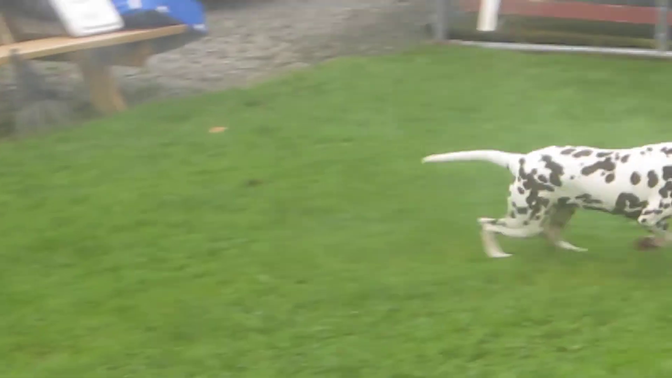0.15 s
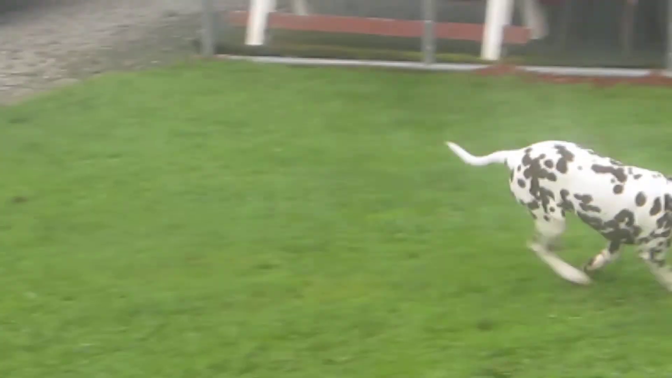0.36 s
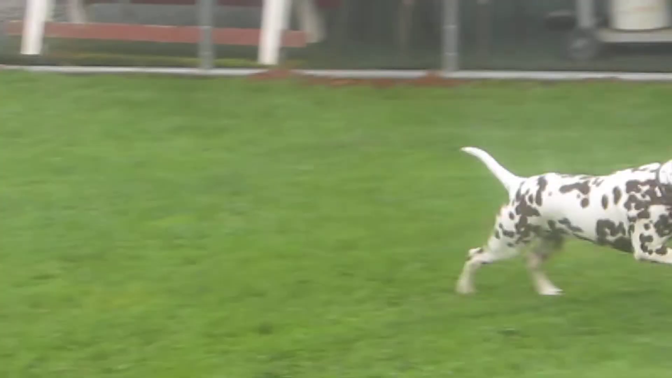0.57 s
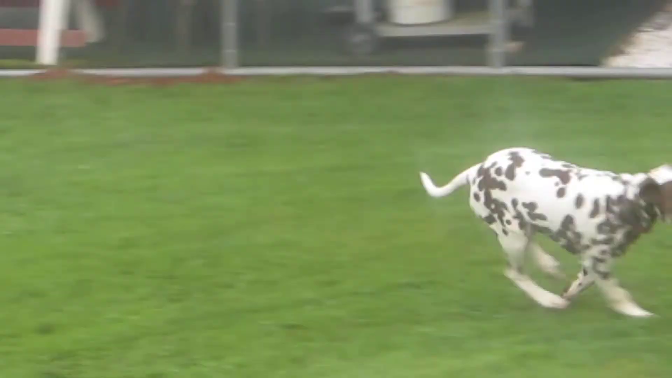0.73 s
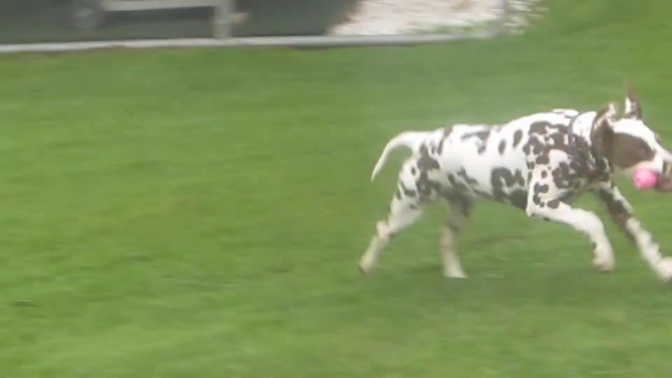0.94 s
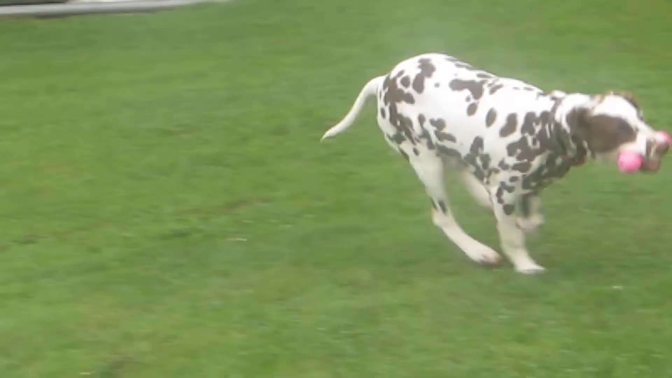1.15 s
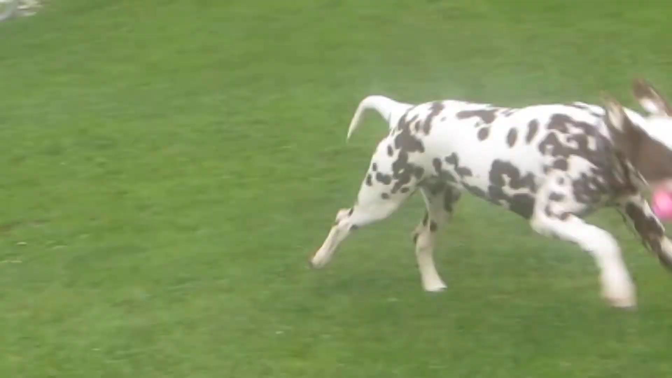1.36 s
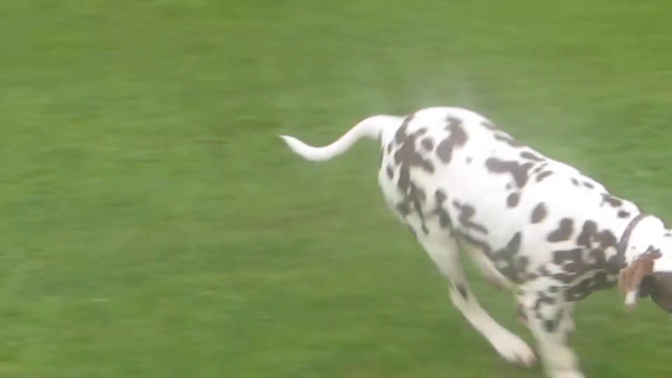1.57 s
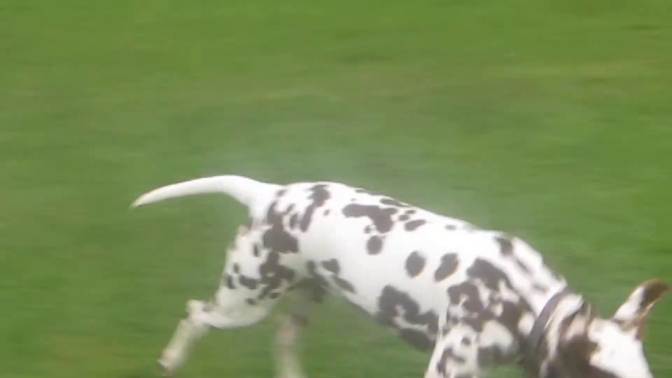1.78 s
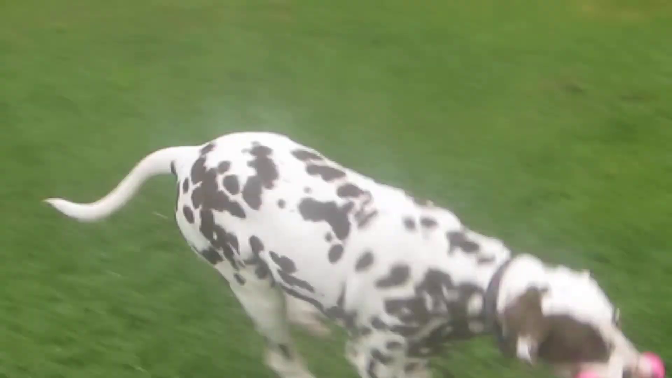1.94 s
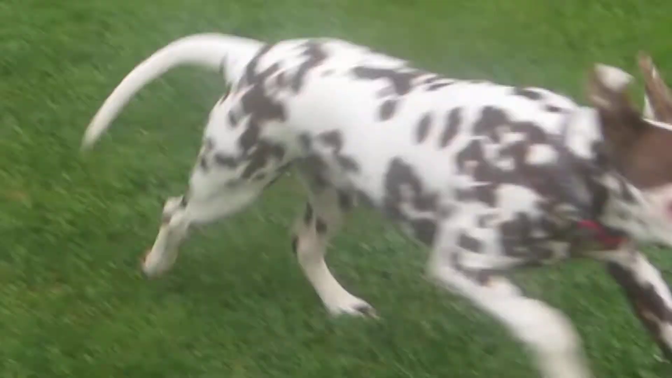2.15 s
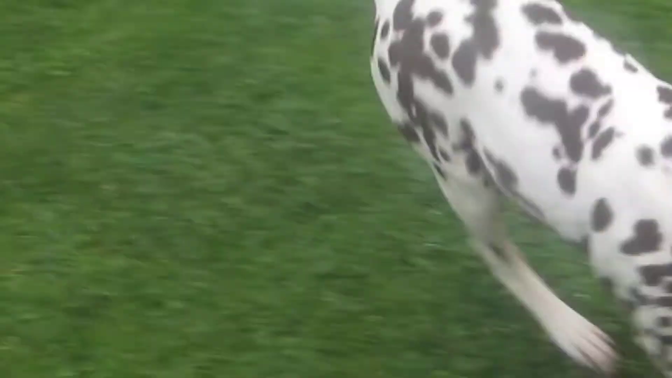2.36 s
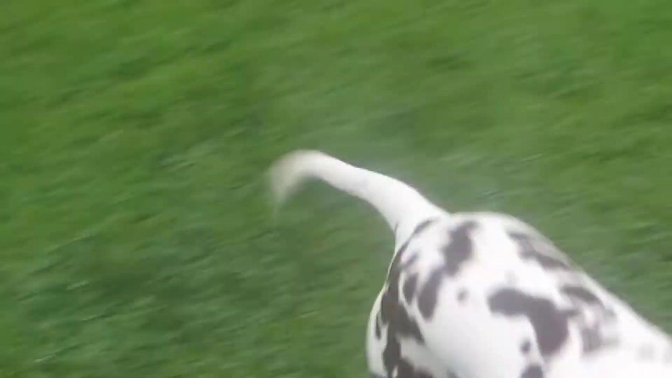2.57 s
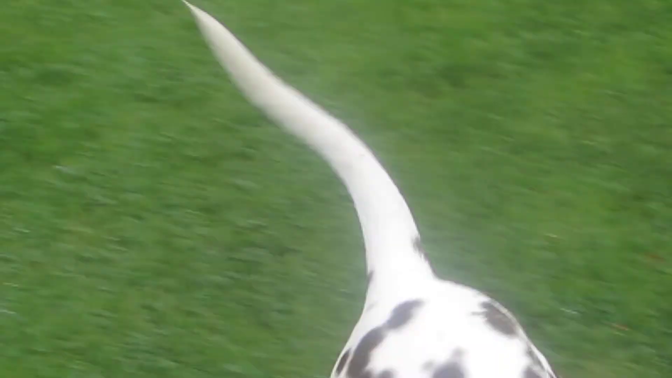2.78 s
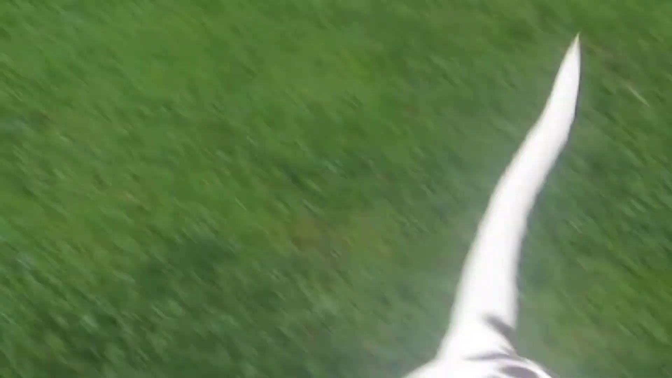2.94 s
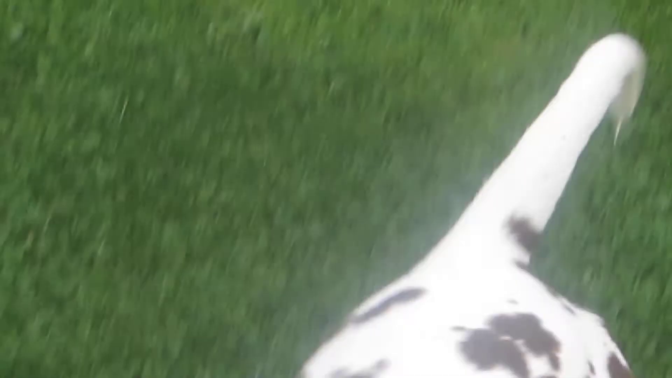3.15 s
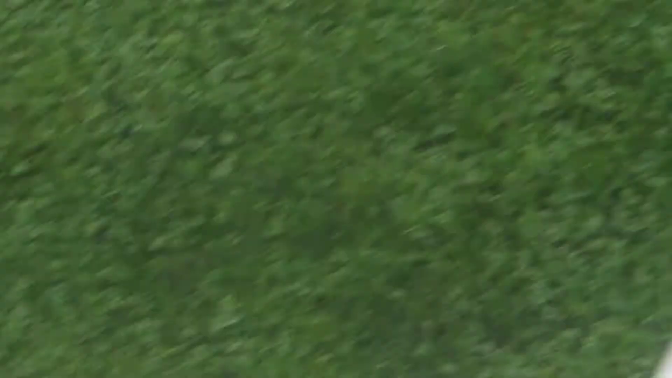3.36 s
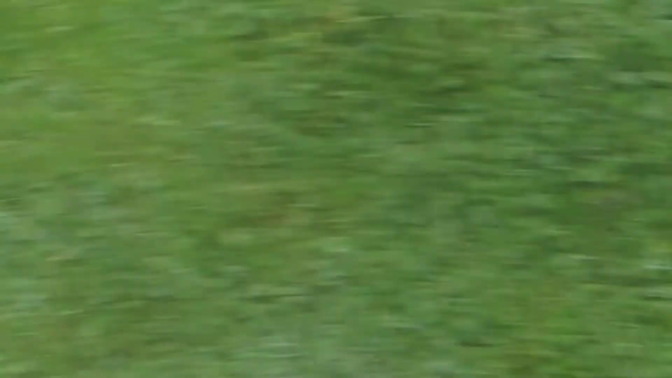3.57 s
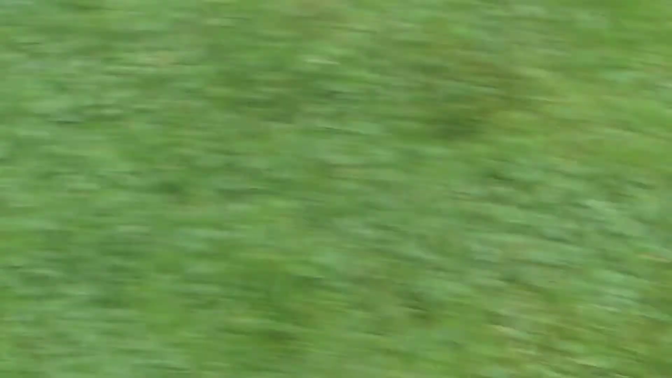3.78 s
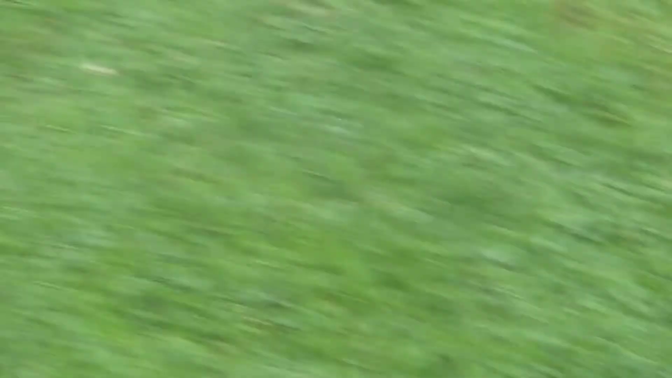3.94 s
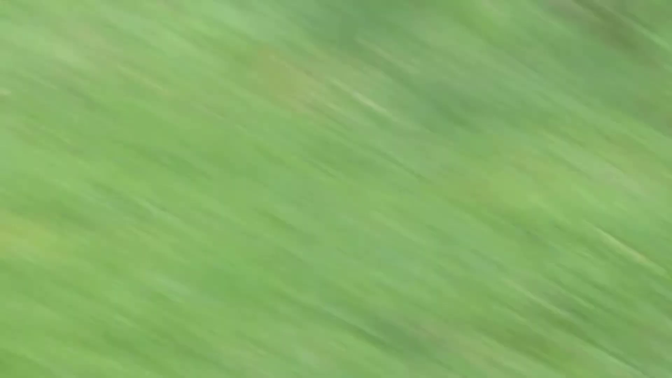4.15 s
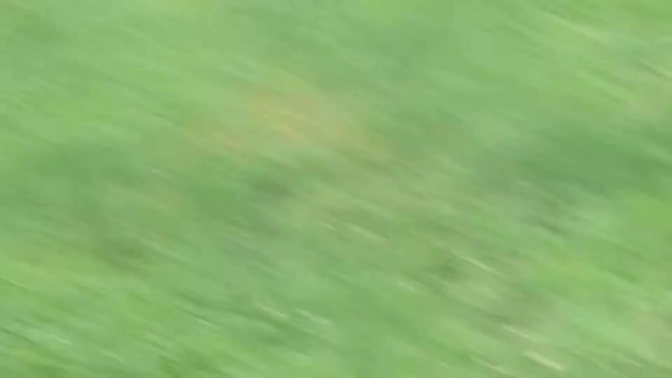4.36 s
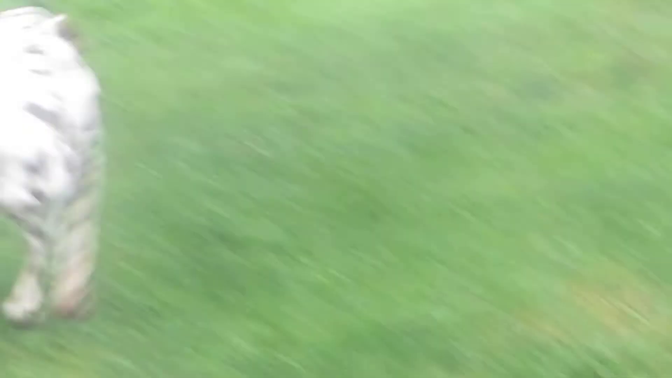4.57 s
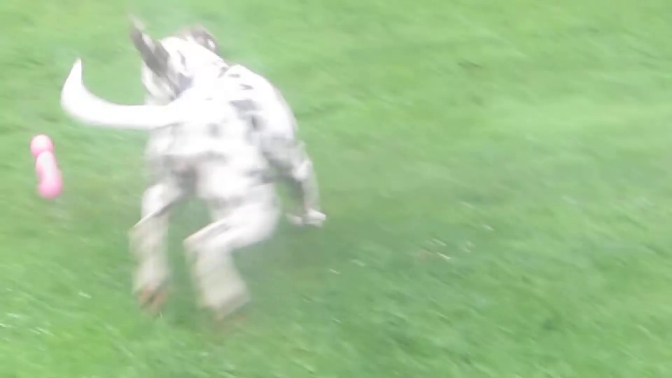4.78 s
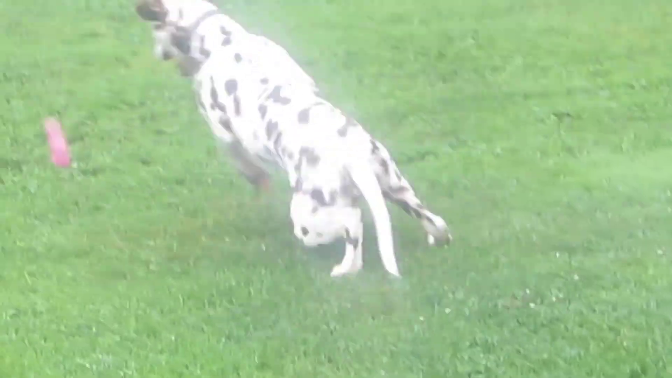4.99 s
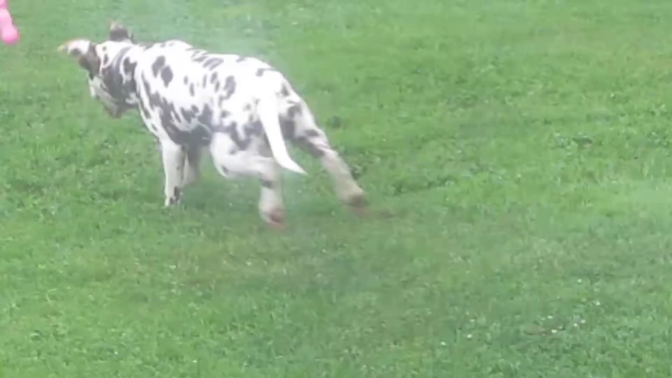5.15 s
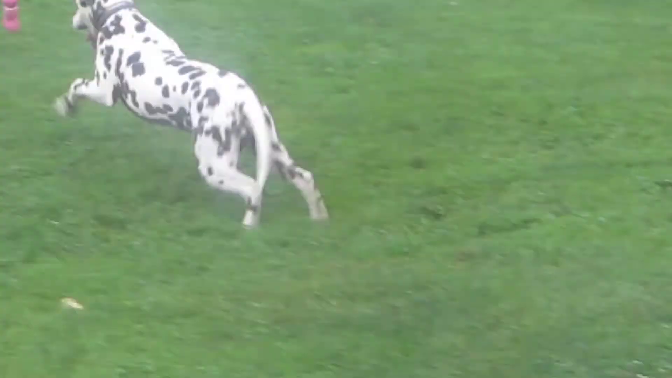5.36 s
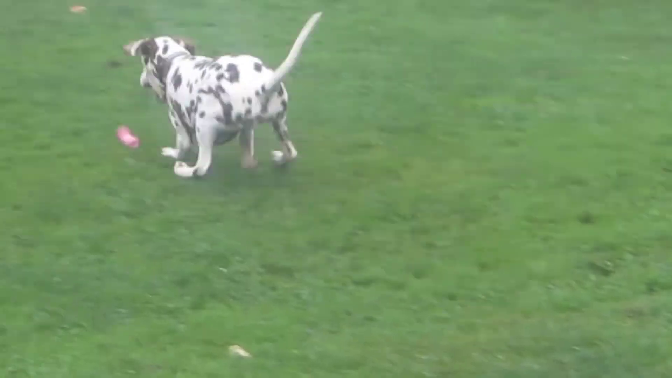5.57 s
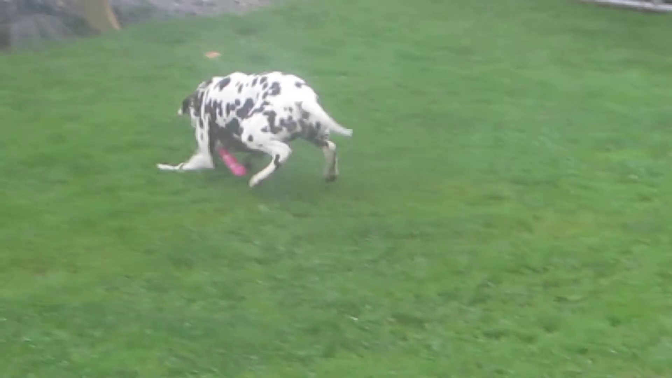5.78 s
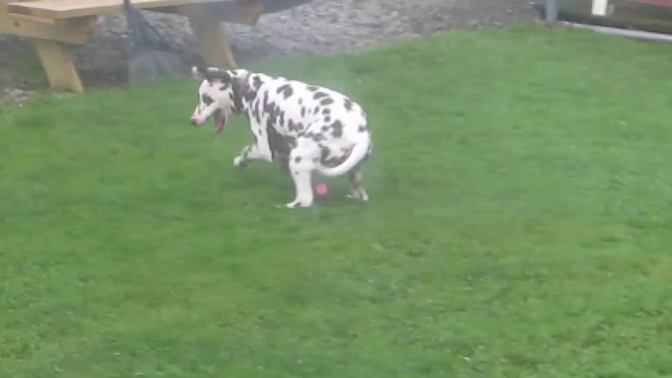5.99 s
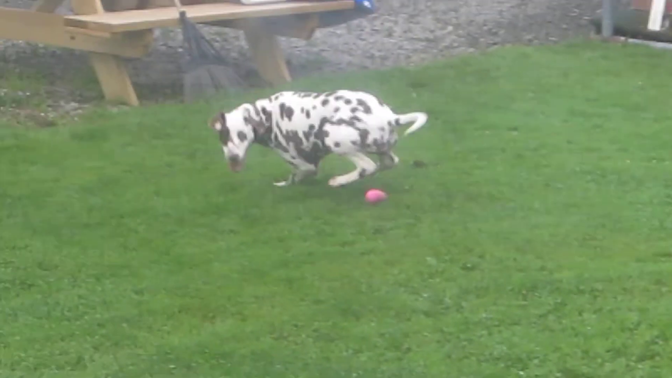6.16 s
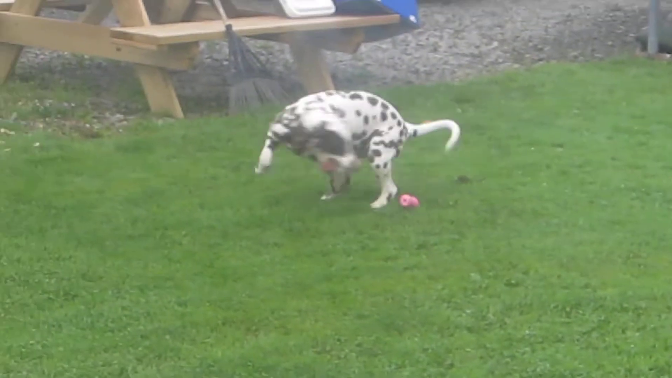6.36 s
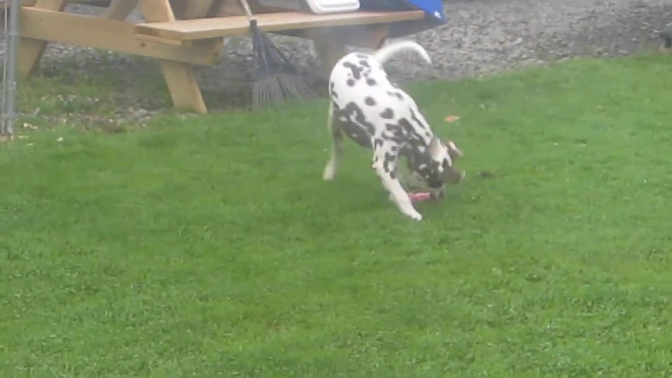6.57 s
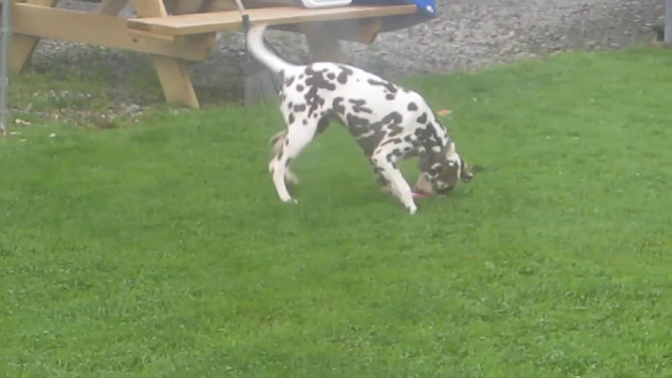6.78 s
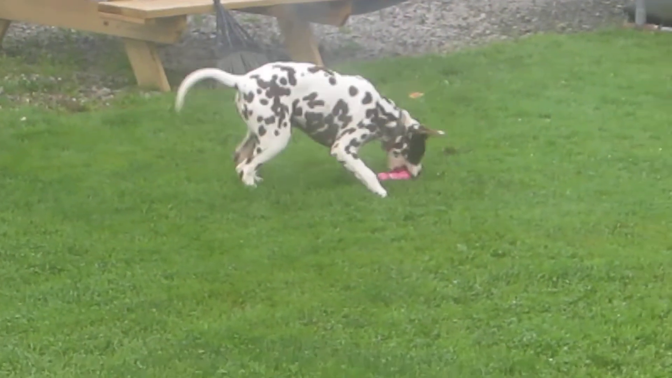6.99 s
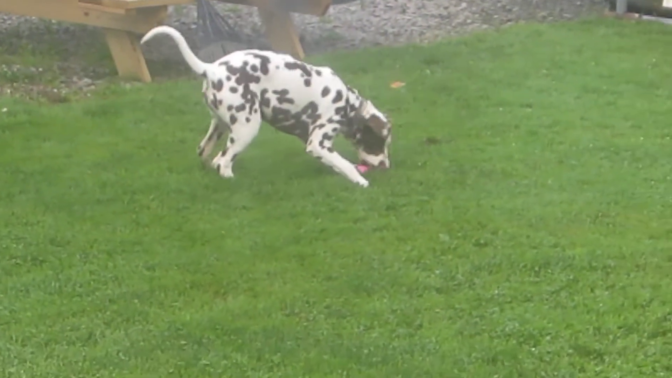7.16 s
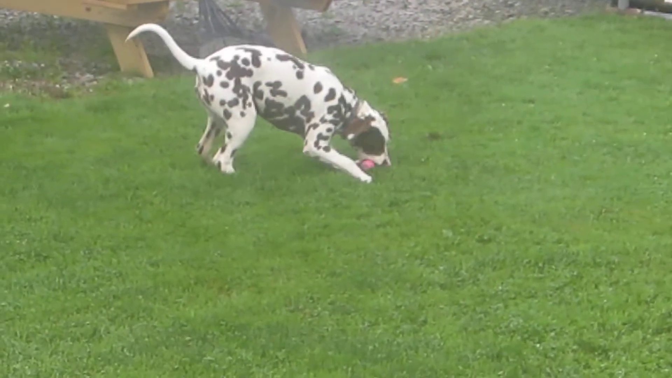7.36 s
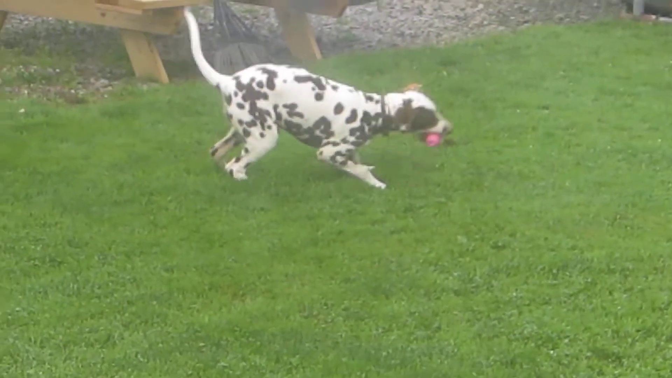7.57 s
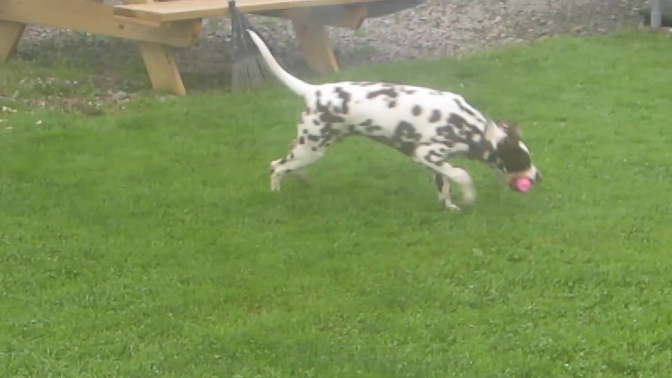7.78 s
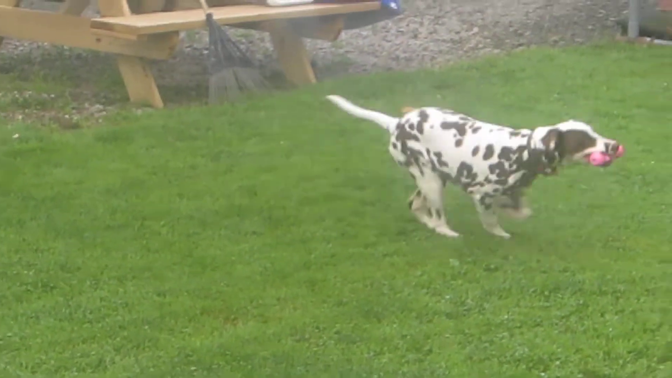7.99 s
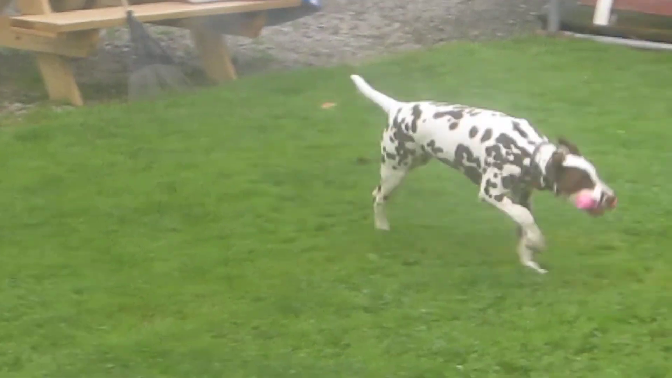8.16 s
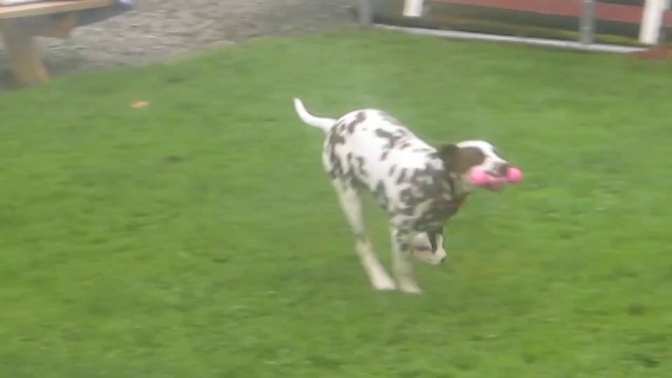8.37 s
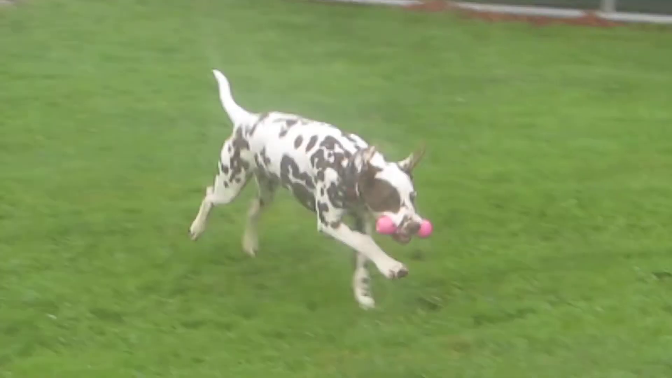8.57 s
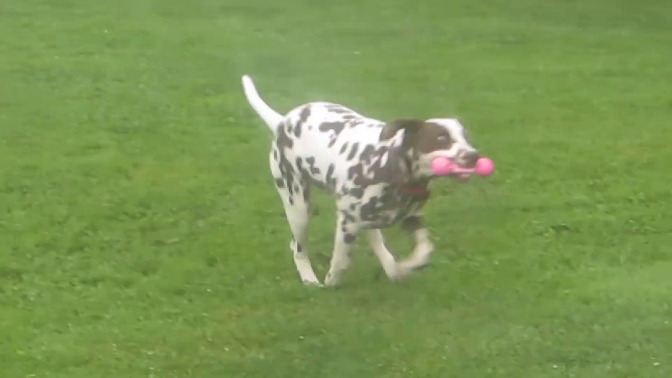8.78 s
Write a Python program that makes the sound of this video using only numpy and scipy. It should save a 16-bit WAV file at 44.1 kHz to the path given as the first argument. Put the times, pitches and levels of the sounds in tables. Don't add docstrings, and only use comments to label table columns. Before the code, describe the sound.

In a backyard with low town rumble and soft hiss, a dog works a squeaky rubber toy. A short nip at 0.1 s leads to a hard bite at 0.3-0.45 s, its reedy pitch leaping up, then wheezy, falling refills. Irregular squeaks and chirps continue through 2 s, with paws swishing grass. Two close, piercing bites at about 2.2 and 2.9 s shoot to the top and pop off; the background briefly dips. From 3.4 to 4.3 s squeaks become weak and muffled. At 4.65 s the toy drops: sharp crack, thud and chirp, with smaller bounces at 5.0 and 5.2 s. Grass rustles, scuffs, faint collar ticks and distant bird whistles fill 4.7-6.9 s, then near quiet. After pickup, bright rising squeaks burst at 7.4, 7.9, 8.4 and 8.75 s, separated by gasping refills, echoing lightly off sheds and fences, the last rising to the end.

```python
import sys
import numpy as np
from scipy import signal
from scipy.fft import rfft, irfft
from scipy.io import wavfile
from scipy.ndimage import uniform_filter1d

SR = 44100
rng = np.random.default_rng(int(sys.argv[2]) if len(sys.argv) > 2 else 0)


def volts_from_decibels(level):
    exponent = np.asarray(level, float) / 20
    return 10 ** exponent


def store_pcm(level_fs):
    pcm = np.round(np.clip(level_fs, -1, 1) * 32767).astype(np.int16)
    wavfile.write(sys.argv[1], SR, np.atleast_2d(pcm).T)


N = 389403


def evened(x):
    return x / np.sqrt(np.mean(x ** 2) + 1e-20)


def read(points, hz):
    f, value = np.transpose(points)
    return np.interp(np.log(hz + 1), np.log(f + 1), value)


def add(mix, s, sound):
    part = mix[round(s * SR):][:len(sound)]
    part += sound[:len(part)]


def drift(shape, s):
    size = max(round(s * SR), 1)
    noise = uniform_filter1d(rng.standard_normal(shape), size)
    return evened(uniform_filter1d(noise, size))


def coloured(points, x):
    gain = volts_from_decibels(read(points, np.fft.rfftfreq(len(x), 1 / SR)))
    return evened(irfft(rfft(x) * gain, len(x)))


def band(x, lo_hz, hi_hz):
    return signal.sosfilt(signal.butter(2, [lo_hz, hi_hz], "bandpass", fs=SR, output="sos"), x)


def town():
    # hz, db_per_hz
    town_spectrum = [(12, -29), (20, -5), (70, 1.5), (191, -7), (267, -6), (316, -8.5), (537, -16),
                     (862, -13.5), (1680, -19), (3670, -21.5), (6970, -32), (7800, -31.5), (15600, -40)]
    # time_s, level_db
    traffic = [(0, -1), (1.1, -1.5), (1.8, 2.5), (2.7, -2), (5.5, 1.5), (6.3, 1.5), (8.3, 0)]
    # pitch_hz, width_hz, level_db
    machine_hums = [(69, 16, -59), (136.8, 13.5, -53.5), (261.2, 9.5, -58.5), (7900, 60, -68.5)]
    # start_s, gain_db
    ducks = [
        (.39, -2),
        (1.2, -1),
        (2.202, -9.5),
        (2.86, -10),
        (7.861, -1),
        (8.46, -1),
    ]
    town_db, recover_s = -48, 0.52
    t = np.arange(N) / SR
    wash = coloured(town_spectrum, rng.standard_normal(N))
    swell_db = 1.5 * drift(N, 0.084) + np.interp(t, *np.transpose(traffic))
    wash += (volts_from_decibels(swell_db) - 1) * band(wash, 110, 1470)
    hums = np.zeros(N)
    for hz, width, db in machine_hums:
        hum = band(rng.standard_normal(N), hz - width / 2, hz + width / 2)
        hums += volts_from_decibels(db + 44.0) * evened(hum)
    ducked_db = np.zeros(N)
    for s, db in ducks:
        ducked_db += db * (t > s) * np.exp(-(np.maximum(t - s, 0) / recover_s) ** 2)
    return volts_from_decibels(town_db + uniform_filter1d(ducked_db, 900)) * (wash + hums)


def paws():
    # middle_s, length_s, blades_db, turf_db
    sweeps = [(0.147, 0.042, -48, -64), (0.246, 0.039, -49, -67), (2.11, 0.17, -54, -49.5),
              (2.639, 0.072, -60, -53), (2.711, 0.085, -50.5, -50.5), (3.177, 0.11, -55, -55.5),
              (3.358, 0.14, -53, -54.5), (4.304, 0.063, -57, -52), (4.473, 0.17, -53.5, -50),
              (4.628, 0.13, -49, -51.5), (4.696, 0.068, -48, -53.5), (4.789, 0.081, -53.5, -65),
              (4.92, 0.054, -56.5, -74), (5.179, 0.081, -46.5, -52), (5.29, 0.074, -47.5, -53),
              (5.516, 0.057, -49, -56), (5.633, 0.18, -47, -57), (5.766, 0.07, -44.5, -52),
              (5.836, 0.097, -46, -51), (5.953, 0.087, -48.5, -67), (6.112, 0.09, -49, -54),
              (6.174, 0.064, -57, -54), (6.263, 0.052, -54.5, -72), (6.625, 0.25, -54, -59),
              (6.862, 0.056, -52.5, -66)]
    # hz, db_per_hz
    blade_spectrum = [(880, -18), (1500, -25), (1840, -9), (2370, -0.5), (5830, 4), (11900, -7),
                      (15500, -16)]
    # time_s, level_db
    trot = [(4.2, -74), (4.6, -74), (5.4, -64), (6.0, -64), (6.5, -63), (7.2, -85)]
    out = np.zeros(N)
    for s, length, blades_db, turf_db in sweeps:
        size = round(1.7 * length * SR)
        snaps = rng.standard_normal(size) * volts_from_decibels(np.minimum(3.5 * drift(size, 0.0032), 6))
        blades = volts_from_decibels(blades_db) * coloured(blade_spectrum, snaps)
        turf = volts_from_decibels(turf_db) * evened(band(snaps, 330, 3000))
        add(out, s - size / SR / 2, (blades + turf) * np.hanning(size))
    bed_db = np.interp(np.arange(N) / SR, *np.transpose(trot)) + 3.4 * drift(N, 0.02)
    return out + volts_from_decibels(bed_db) * coloured(blade_spectrum, rng.standard_normal(N))


def arch(row, shape):
    swell_db_per_khz = 25
    round_s, droop_power = 0.0052, 3.11
    s, length, share, top_hz, db = row
    rest_hz, least_hz, rise, sunk_hz, sink, droop_hz, fade_db, fade = shape
    u = np.arange(41) / 40
    share = np.clip(share, 0.02, 0.98)
    up = np.minimum(u / share, 1)
    down = np.maximum(u - share, 0) / (1 - share)
    short_hz = max(top_hz - rest_hz, least_hz) * (1 - up) ** rise
    hz = top_hz - short_hz - max(top_hz - sunk_hz, 0) * down ** sink - droop_hz * down ** droop_power
    hz = uniform_filter1d(hz, 1 + round(40 * round_s / length), mode="nearest")
    level_db = db - swell_db_per_khz * short_hz / 1000 + fade_db * down ** fade
    return np.transpose([s + u * length, hz, level_db])


def bite(rows):
    # from_hz, to_hz, flare_db
    leaps = [(1634, 1850, 2.5), (2368, 2960, -8.5)]
    flare_hz = 90
    s, hz, db = np.transpose(rows)
    t = np.arange(s[0], s[-1], 0.0005)
    low, high, flare_db = np.transpose(leaps)
    gap = high - low
    skipped_before = np.cumsum(gap) - gap
    skipped_after = np.cumsum(gap) - 1
    pitch = np.concatenate([[0], np.ravel([low, high], "F"), [9000]])
    skipped = np.concatenate([[0], np.ravel([skipped_before, skipped_after], "F"), [np.sum(gap)]])
    push = pitch - skipped
    rising = t < s[np.argmax(hz)]
    pressure = np.interp(t, s, np.interp(hz, pitch, push))
    climbed = np.interp(pressure, push, pitch)
    above = climbed[:, None] - high
    flare = (flare_db * (above >= 0) * np.exp(-abs(above) / flare_hz)).sum(1)
    reed_hz = np.where(rising, climbed, np.interp(t, s, hz))
    return np.transpose([t, reed_hz, np.interp(t, s, db) + rising * flare])


def pop(s, length, db):
    return [(s, 3490, db), (s + length / 2, 1914, db - 3), (s + length, 1160, db - 9.5)]


def squeak(rows, shade, lean_db, drawn_in):
    # start_s, end_s, level_db
    halves = [
        (0.417, 0.452, 0),
        (2.305, 2.315, -6.5),
        (2.925, 2.941, -12),
        (7.43, 7.468, -11.5),
        (7.96, 7.971, -9),
        (8.481, 8.49, -3),
        (8.797, 8.82, -12),
    ]
    # hz, level_db
    housing = [(1100, -22), (1600, -20.5), (2400, -19), (3100, -12), (3800, -11), (4800, 2), (5700, 4.5),
               (6400, -7), (7400, -10), (8500, -16), (10000, -14.5), (12300, -14.5), (13800, -33.5),
               (15600, -52)]
    # hz, level_db
    refill_colour = [(3800, 5), (6200, -1.5), (7600, -23), (9500, -2.5), (12000, 1.5)]
    third_db = 1
    flutter_db = 2.5
    beads_db, beads_per_db, bead_s = 1, 0.03, 0.0033
    top_hz, top_db = 3030, 2
    soft_lift = 0.5
    air_db, wobble = -33, 0.004
    shock, shock_s = 0.06, 0.022
    evenness = 0.44 if drawn_in else 0.65

    s, *columns = np.transpose(rows)
    t = np.arange(s[0], s[-1], 1 / SR)
    hz, db = (uniform_filter1d(np.interp(t, s, c), 60) for c in columns)
    unsteady = wobble + shock * (len(t) < shock_s * SR)
    hz = hz * (1 + unsteady * drift(len(t), 0.0017))
    half = sum(volts_from_decibels(d) * np.clip(np.minimum(t - a, b - t) / 0.001, 0, 1) for a, b, d in halves)

    k = np.arange(1, 29)[:, None] / 2
    low, mid, third, high = shade
    shading = [(1700, low), (2100, mid), (2900, mid), (3600, third_db + third), (4300, -lean_db / 2),
               (4800, -lean_db / 2), (5600, lean_db / 2), (6800, high / 2), (8000, high)]
    size_db = read(housing, k * hz) + read(shading, k * hz)
    size = volts_from_decibels(size_db + drawn_in * read(refill_colour, k * hz))
    flutter = flutter_db * drift((28, len(t)), 0.023)
    beads = (beads_db + beads_per_db * max(low, 0)) * drift((28, len(t)), bead_s)
    size *= volts_from_decibels(flutter + beads)
    size *= np.where(k % 1 == 0, 1, half * (k > 1) + 0.6 * half) * (k * hz < 15800)
    size[1] *= volts_from_decibels(top_db * np.clip((hz - top_hz) / 200, 0, 1))
    size[1] *= volts_from_decibels(soft_lift * np.minimum(db.max() - db, 15))

    turns = np.cumsum(hz) / SR
    tone = (size * np.cos(2 * np.pi * (k * turns + rng.random((28, 1))))).sum(0)
    power = (size ** 2).sum(0) / 2
    tone /= np.sqrt(power ** evenness * power.mean() ** (1 - evenness))
    air = volts_from_decibels(air_db) * coloured(housing, rng.standard_normal(len(t)))
    air *= 1 + np.minimum(abs(np.gradient(hz)), 3.0) / 0.31
    edges = np.clip((t - s[0]) / 0.002, 0, 1) * np.clip((s[-1] - t) / 0.0039, 0, 1)
    return volts_from_decibels(db) * edges * (tone + air)


def squeaks():
    # start_s, length_s, share_before_top, top_hz, level_db
    squeezes = [
        (0.068, 0.052, 0.037, 1188, -24.5),
        (0.646, 0.073, 0.49, 1321, -21),
        (1.798, 0.047, 0.098, 1168, -20),
        (1.953, 0.028, 0.036, 1174, -19),
        (3.706, 0.0366, 0.18, 1154, -31),
        (4.058, 0.037, 0.044, 1165, -30.5),
        (4.109, 0.037, 0.46, 1144, -34.5),
    ]
    # start_s, length_s, share_before_top, top_hz, level_db
    refills = [
        (1.58, 0.021, 0.56, 1200, -33),
        (3.758, 0.071, 0.031, 1232, -29),
        (3.988, 0.032, 0.042, 1184, -32.5),
        (4.285, 0.03, 0.62, 1302, -43.5),
    ]
    # time_s, pitch_hz, level_db
    bites_in = [
        [(.266, 1153, -23.5), (.344, 1237, -19), (.387, 1660, -14.5), (.404, 1950, -21), (.419, 2410, -15.5),
         (.436, 3180, -18.5), (.454, 2770, -22), (.457, 1980, -14), (.469, 1160, -35)],
        [(1.174, 1164, -20.5), (1.192, 1255, -19), (1.204, 1405, -16), (1.229, 1620, -19.5),
         (1.255, 2030, -18.5), (1.269, 2010, -16), (1.284, 1765, -18), (1.286, 1500, -25), (1.298, 1160, -16)],
        [(2.196, 1142, -14.5), (2.211, 1290, -21.5), (2.245, 1670, -17.5), (2.281, 1890, -20.5),
         (2.301, 2374, -13.5), (2.311, 3250, -19.5), (2.324, 3900, -24), (2.332, 4500, -48)],
        [(2.854, 1165, -18), (2.872, 1228, -17.5), (2.893, 1480, -21), (2.901, 1640, -21.5),
         (2.912, 1996, -16.5), (2.921, 2410, -14), (2.94, 3490, -21), (2.953, 4100, -16), (2.96, 4400, -40)],
    ]
    # time_s, pitch_hz, level_db
    bites_back = [
        [(3.402, 1146, -23), (3.448, 1200, -24), (3.502, 1342, -20.5), (3.508, 1260, -20), (3.512, 1240, -29),
         (3.517, 1175, -20.5), (3.532, 1080, -41)],
        [(7.402, 1133, -23), (7.421, 1256, -19.5), (7.425, 1368, -17), (7.435, 1520, -16.5), (7.438, 2013, -17),
         (7.452, 2207, -16.5), (7.466, 2040, -16), (7.475, 1730, -20), (7.49, 1230, -34)],
        [(7.851, 1171, -18.5), (7.899, 1284, -18), (7.927, 1660, -17.5), (7.944, 2037, -19.5),
         (7.955, 2450, -11), (7.968, 3370, -19), (7.983, 4080, -22), (7.991, 4450, -16)],
        [(8.373, 1190, -22.5), (8.389, 1267, -22.5), (8.403, 1226, -23), (8.428, 1267, -20.5),
         (8.434, 1368, -20.5), (8.458, 1635, -19.5), (8.477, 2400, -14), (8.5, 3750, -22), (8.52, 4250, -29)],
        [(8.737, 1160, -24.5), (8.75, 1250, -21), (8.76, 1360, -23.5), (8.772, 1490, -21.5), (8.783, 1630, -17),
         (8.802, 2134, -22), (8.817, 2270, -16), (8.824, 2430, -13.5), (8.832, 3170, -15)],
    ]
    # start_s, length_s, level_db
    pops = [
        (2.354, 0.012, -16.5),
        (3.009, .018, -16),
        (8.024, 0.014, -16),
        (8.543, 0.019, -15.5),
    ]
    # time_s, pitch_hz, level_db
    long_refills = [
        [(0.479, 1300, -22), (0.489, 1398, -28.5), (0.521, 1412, -26), (0.545, 1562, -22.5), (0.589, 1385, -23),
         (0.597, 1260, -28), (0.603, 1280, -33), (0.617, 1170, -27)],
        [(0.743, 1270, -24), (0.753, 1298, -24.5), (0.799, 1312, -26.5), (0.813, 1266, -27.5),
         (0.851, 1194, -35), (0.86, 1260, -40)],
        [(2.372, 1296, -23), (2.38, 1400, -29.5), (2.404, 1530, -22.5), (2.424, 1526, -22.5),
         (2.478, 1285, -25.5), (2.522, 1210, -28.5), (2.53, 1120, -44)],
        [(3.034, 1327, -27), (3.05, 1520, -25), (3.06, 1540, -20.5), (3.078, 1490, -23.5), (3.146, 1187, -29.5),
         (3.155, 1210, -35)],
        [(3.543, 1190, -29), (3.549, 1260, -23.5), (3.575, 1231, -26), (3.593, 1297, -19.5),
         (3.607, 1252, -31.5), (3.643, 1205, -33.5), (3.662, 1120, -56)],
        [(7.603, 1280, -29), (7.613, 1495, -27), (7.631, 1384, -24), (7.651, 1230, -33.5), (7.66, 1210, -30)],
        [(8.047, 1324, -35), (8.053, 1330, -27.5), (8.075, 1428, -25.5), (8.091, 1612, -21), (8.107, 1555, -24),
         (8.147, 1325, -26.5), (8.16, 1190, -36)],
        [(8.569, 1268, -29), (8.581, 1490, -24.5), (8.589, 1502, -23), (8.603, 1401, -26.5),
         (8.631, 1382, -24.5), (8.693, 1232, -29), (8.725, 1206, -37)],
    ]
    # time_s, pitch_hz, level_db
    mid_refills = [
        [(1.038, 1270, -21), (1.05, 1322, -20.5), (1.116, 1220, -26.5), (1.13, 1156, -37)],
        [(1.307, 1354, -24.5), (1.323, 1573, -20), (1.333, 1540, -22.5), (1.393, 1277, -23), (1.42, 1165, -34)],
        [(1.523, 1274, -24.5), (1.548, 1305, -24), (1.574, 1200, -30.5)],
        [(1.695, 1265, -21), (1.74, 1211, -27.5), (1.764, 1130, -38)],
        [(2.646, 1265, -22), (2.654, 1305, -20.5), (2.684, 1190, -28.5), (2.69, 1190, -42)],
        [(2.77, 1250, -23), (2.776, 1259, -20.5), (2.808, 1213, -25.5), (2.833, 1110, -34)],
        [(4.173, 1227, -33), (4.191, 1228, -28.5), (4.215, 1201, -30), (4.243, 1130, -40.5)],
    ]
    # time_s, pitch_hz, level_db
    firm_squeezes = [
        [(0.942, 1194, -22), (0.95, 1213, -22), (0.964, 1403, -17.5), (0.978, 1476, -18.5), (0.998, 1373, -19),
         (1.014, 1190, -20.5), (1.027, 1124, -27)],
        [(1.441, 1130, -23.5), (1.457, 1171, -18), (1.475, 1196, -19.5), (1.491, 1143, -20), (1.5, 1060, -35)],
        [(1.605, 1162, -21), (1.619, 1203, -17.5), (1.653, 1147, -20.5), (1.661, 1100, -22), (1.668, 1030, -32)],
        [(3.907, 1130, -35), (3.923, 1168, -25), (3.931, 1150, -29.5), (3.939, 1129, -26), (3.949, 1060, -36)],
    ]
    # time_s, pitch_hz, level_db
    bounces = [
        [(4.6552, 1294, -18), (4.657, 1670, -12), (4.6585, 1755, -21), (4.6605, 1410, -18), (4.664, 1250, -28),
         (4.67, 1140, -40)],
        [(5.0135, 1320, -38), (5.016, 1306, -24), (5.022, 1210, -47)],
    ]
    # rest_hz, least_rise_hz, rise_power, sunk_hz, sink_power, droop_hz, fade_db, fade_power
    squeeze_arch = (1173, 47, 2.5, 1113.5, 0.86, 102, -11, 2.5)
    refill_arch = (1304, 7.5, 0.5, 1243.5, 0, 104, -8.5, 2)
    # time_s, first_partial_db, second_db, third_db, lean_db (5.8 against 4.6 kHz)
    away = [(.07, 1, 2.5, -14, -5), (.27, -7.5, 0, 0.5, 5), (.48, 0, -2.5, 1, 2.5), (.65, -4, 0.5, -5, 5.5),
            (.74, -6.5, 0.5, 0.5, 6), (.94, -1, -3.5, 0, -1), (1.04, -3.5, 0.5, -23, -5),
            (1.17, 0, -2.5, 2, -4), (1.31, -4.5, 1.5, -10, 0), (1.44, 5, -2, 0, 14.5),
            (1.52, 5.5, 5.5, -9, -2), (1.6, 7.5, 3, -2, 12), (1.7, 6, 2.5, -9, -1), (1.8, -0.5, 7, -10, -1),
            (1.95, 8, 6.5, -6, 13.5), (2.2, -2, 1, -0.5, 0), (2.37, -2, 5.5, 1.5, 9),
            (2.65, 10, 5.5, -1, 8), (2.77, 6, 6.5, 4.5, 3), (2.85, 6, 3.5, 5.5, 1.5), (3.03, 5, 3, 0.5, 2),
            (3.4, 8.5, 7.5, 8, -0.5), (3.54, 10.5, 21, 8, -6), (3.71, 15.5, 17.5, -1, -2.5),
            (3.76, 26, 11.5, 7, 3.5), (3.91, 13, 11.5, 1, -20), (3.99, 25, 14, 1, -1),
            (4.06, 20, 11, -11, -7), (4.11, 23.5, 4, -5, -8), (4.17, 27.5, 10, 5, -9), (4.65, 0, 9, 4.5, 3),
            (5.01, -6, -15, -7, -5), (7.4, -2, -9, -17, -0.5), (7.6, -5.5, 2.5, 6, 0),
            (7.85, -8.5, -3.5, 2, 0), (8.05, 2.5, -4, 10, 7.5), (8.37, 0, -3, 2.5, 4),
            (8.57, -2, 0.5, -14, 2), (8.74, -2.5, 0, 0, -2)]
    # time_s, level_db
    treble = [(0, 1), (1, -3), (2, 1.5), (2.6, 3), (3, 0.5), (3.4, 1), (4.1, -7), (4.65, -8), (7.4, -4.5),
              (7.6, 1.5), (7.85, -1), (8.05, -1), (8.37, -2), (8.74, -4)]
    # under 1.9 kHz, 1.9-3.3 kHz, over 7.5 kHz
    bite_shade, pop_shade = (-0.37, 1, -0.49), (-0.75, -3.5, -4)
    squeeze_shade, refill_shade = (-1, 0.32, 0.72), (0.52, 0.59, 6.2)
    away_high = 0.022
    refill_lean_db = -1

    strokes = [(bite(rows), bite_shade, False) for rows in bites_in + bites_back]
    strokes += [(pop(*row), pop_shade, False) for row in pops]
    strokes += [(arch(row, squeeze_arch), squeeze_shade, False) for row in squeezes]
    strokes += [(arch(row, refill_arch), refill_shade, True) for row in refills]
    strokes += [(rows, refill_shade, True) for rows in long_refills + mid_refills]
    strokes += [(rows, squeeze_shade, False) for rows in firm_squeezes]
    strokes += [(rows, bite_shade, False) for rows in bounces]
    at, *aims = np.transpose(away)
    out = []
    for rows, shade, drawn_in in strokes:
        s = rows[0][0]
        first_db, second_db, third_db, lean_db = (np.interp(s, at, c) for c in aims)
        high_db = away_high * first_db + np.interp(s, *np.transpose(treble))
        heard = np.add(np.insert(shade, 2, 0), [first_db, second_db, third_db, high_db])
        out.append((s, squeak(rows, heard, lean_db + refill_lean_db * drawn_in, drawn_in)))
    return out


def knock(db, hz):
    t = np.arange(1300) / SR
    crack = rng.standard_normal(len(t)) * np.exp(-t / 0.0026) * np.minimum(t / 0.00024, 1)
    ring = band(crack, 0.89 * hz, 1.127 * hz) + 0.094 * band(crack, 830, 4700)
    return volts_from_decibels(db) * ring / abs(ring).max()


def scuffs():
    # middle_s, length_s, low_hz, high_hz, level_db
    drags = [
        (2.68, 0.062, 1010, 1800, -49),
        (3.17, 0.06, 497, 900, -50),
        (4.308, 0.06, 1000, 1700, -44),
        (5.84, .055, 600, 1480, -44),
        (6.177, 0.052, 1910, 4200, -44),
    ]
    out = np.zeros(N)
    for s, length, lo_hz, hi_hz, db in drags:
        size = round(length * SR)
        grit = rng.standard_normal(size) * volts_from_decibels(2.4 * drift(size, 0.0039))
        drag = volts_from_decibels(db) * evened(band(grit, lo_hz, hi_hz))
        add(out, s - length / 2, drag * signal.windows.tukey(size, 0.6))
    return out


def tick(db, decay_s):
    t = np.arange(400) / SR
    click = band(rng.standard_normal(len(t)) * np.exp(-t / decay_s), 530, 5800)
    return volts_from_decibels(db) * click / abs(click).max()


def thud(db):
    t = np.arange(1800) / SR
    push = np.sin(2 * np.pi * 210 * t * np.exp(-t / 0.22))
    push *= np.minimum(t / 0.00082, 1) * np.exp(-t / 0.0022)
    return volts_from_decibels(db) * band(push, 120, 450)


def whistles():
    # start_s, end_s, from_hz, to_hz, level_db
    calls = [
        (6.285, 6.37, 5300, 3050, -63),
        (5.44, 5.48, 3500, 2600, -54),
        (5.49, 5.6, 3000, 3400, -55),
        (5.83, 6.06, 6050, 6600, -66),
        (8.23, 8.37, 2900, 3000, -59),
        (5.98, 6.07, 4600, 5050, -63),
        (6.16, 6.34, 6050, 6050, -62),
    ]
    out = np.zeros(N)
    for start, end, from_hz, to_hz, db in calls:
        hz = np.linspace(from_hz, to_hz, round((end - start) * SR))
        level = volts_from_decibels(db + 3.1 * drift(len(hz), 0.0056))
        wavering_hz = hz * (1 + 0.02 * drift(len(hz), 0.0044))
        tone = np.sin(2 * np.pi * np.cumsum(wavering_hz) / SR)
        add(out, start, level * tone * signal.windows.tukey(len(hz), 0.5))
    return out


def near_sounds():
    # start_s, peak_db, ring_hz
    knocks = [(1.529, -21.5, 1550), (2.091, -29, 1950), (2.133, -35, 970), (4.513, -37, 2680),
              (4.596, -42, 1650), (4.785, -34, 1660), (5.004, -41, 2190), (4.661, -12, 5300),
              (4.657, -26, 2030), (5.834, -37, 1080), (7.497, -37, 5300), (5.39, -37.5, 2400),
              (5.508, -27, 2500), (5.558, -34, 5710), (6.929, -36, 970), (4.657, -27, 780)]
    # start_s, peak_db
    landings = [
        (4.655, -10),
        (5.017, -24.5),
        (5.227, -22),
        (7.436, -23),
    ]
    # start_s, peak_db, decay_s
    sharp_clicks = [
        (3.248, -27.5, 0.0017),
        (4.654, -13.5, 0.00047),
        (5.415, -42, .001),
        (6.2, -40, .001),
        (6.116, -41, .001),
        (5.012, -30, 0.00086),
        (4.8, -29, 0.0017),
        (8.302, -39, .002),
    ]
    sounds = squeaks()
    sounds += [(s, knock(*blow)) for s, *blow in knocks]
    sounds += [(s, thud(db)) for s, db in landings]
    sounds += [(s, tick(*click)) for s, *click in sharp_clicks]
    return sounds


def yard(sounds):
    # time_s, near_delay_s, near_db, far_delay_s, far_db
    wall_echoes = [(0, 0.079, -19, 0.18, -37), (.4, 0.063, -23, 0.18, -29), (.7, 0.058, -16, 0.13, -27),
                   (1.499, 0.062, -25, .1, -27.5), (1.95, 0.051, -37, 0.09, -32),
                   (2.199, 0.06, -41, 0.13, -38), (2.801, 0.057, -50, 0.15, -47),
                   (3.399, 0.07, -36, .115, -22), (3.7, 0.071, -25, 0.12, -16.5),
                   (4.2, 0.069, -18, 0.11, -15.5), (4.65, .047, -21.5, 0.098, -19.5),
                   (7.5, 0.03, -29, 0.17, -25), (7.861, 0.066, -31, .15, -22),
                   (8.05, 0.074, -21, 0.14, -27.5), (8.4, 0.04, -21, 0.1, -38)]
    # time_s, level_db
    wash_levels = [(0, -21), (1.5, -22), (2.5, -27), (3.7, -21.5), (4.6, -25), (7.5, -23.5), (8.0, -21),
                   (8.6, -14.5)]
    ground_s, ground_db = 0.0021, -12
    shed_s, shed_db = 0.028, -30.5
    wash_t60_s = 0.84
    near, thrown = np.zeros(N), np.zeros(N)
    at, *columns = np.transpose(wall_echoes)
    for s, sound in sounds:
        add(near, s, sound)
        add(near, s + ground_s, volts_from_decibels(ground_db) * sound)
        first, first_db, second, second_db = (np.interp(s, at, c) for c in columns)
        add(thrown, s + shed_s, volts_from_decibels(shed_db) * sound)
        add(thrown, s + first, volts_from_decibels(first_db) * sound)
        add(thrown, s + second, volts_from_decibels(second_db) * sound)
    t = np.arange(SR // 2) / SR
    taps = rng.choice([-1., 1.], len(t)) * (rng.random(len(t)) < 0.03)
    taps *= np.clip(t / 0.021, 0, 1) * volts_from_decibels(-60 * t / wash_t60_s)
    boards = rng.standard_normal(1800) * np.exp(-np.arange(1800) / 45.0)
    thrown = signal.oaconvolve(thrown, boards / np.linalg.norm(boards))[:N]
    sent = volts_from_decibels(np.interp(np.arange(N) / SR, *np.transpose(wash_levels))) * near
    thrown += signal.oaconvolve(sent, taps / np.linalg.norm(taps))[:N]
    return near + band(thrown, 1400, 15700)


def scene():
    mix = yard(near_sounds()) + paws() + scuffs() + whistles() + town()
    return np.array([mix, mix])


def band_limit(x):
    return signal.sosfilt(signal.butter(12, 15800, fs=SR, output="sos"), x)


def record(dry):
    return band_limit(dry)


dry = scene()
out = record(dry)
store_pcm(out)
```